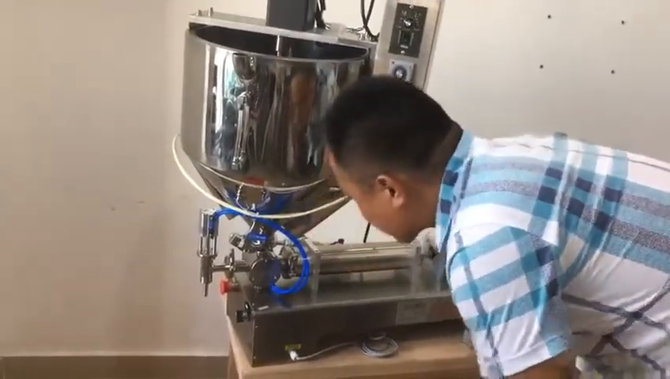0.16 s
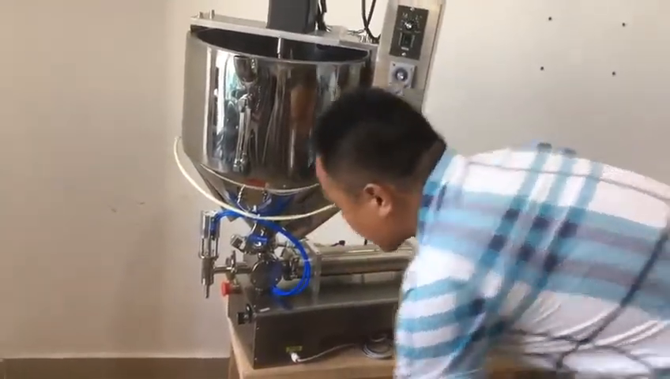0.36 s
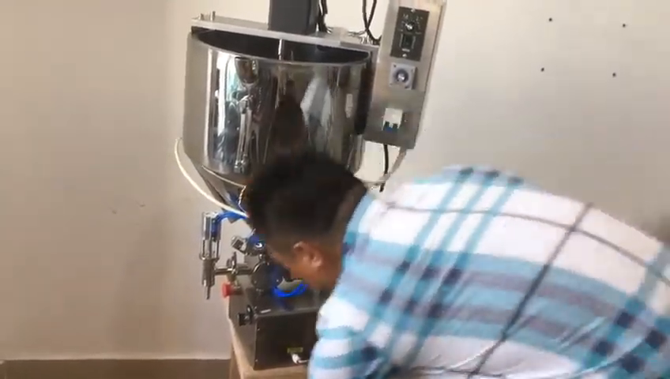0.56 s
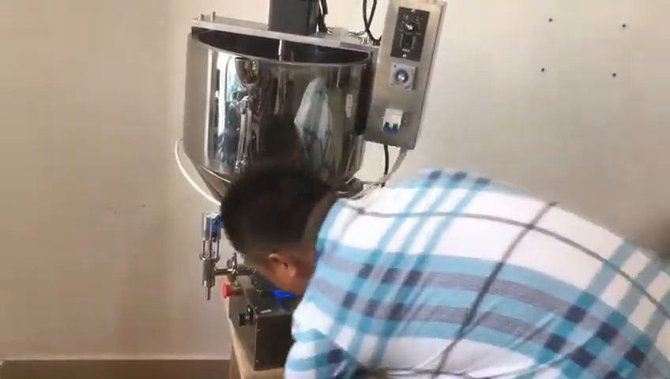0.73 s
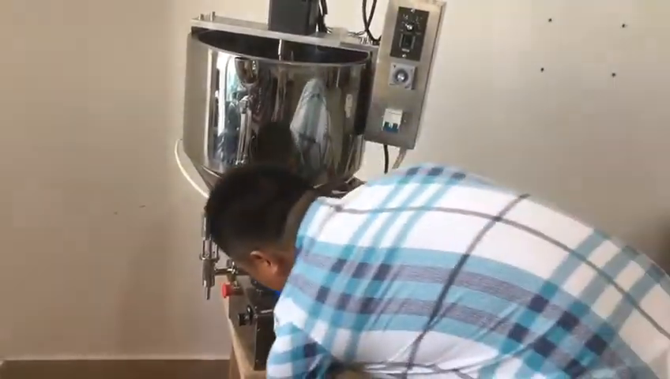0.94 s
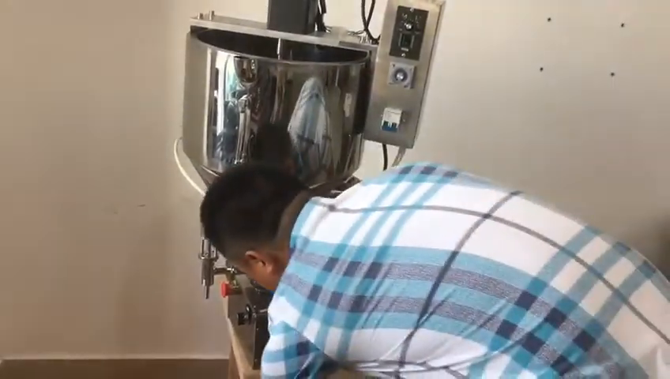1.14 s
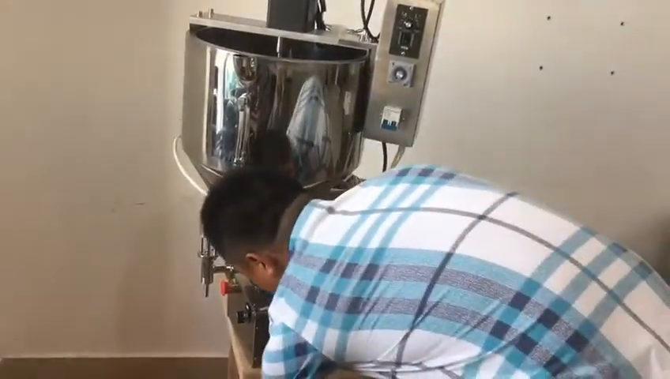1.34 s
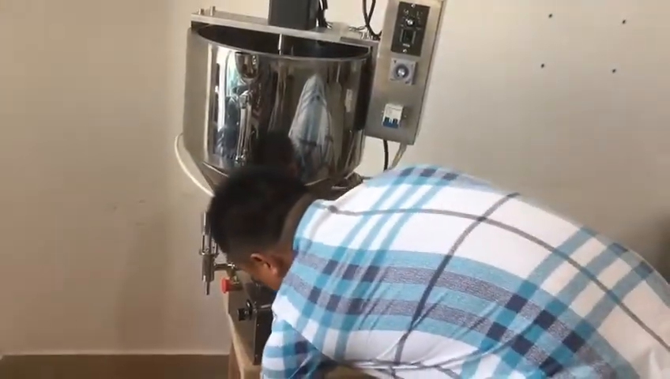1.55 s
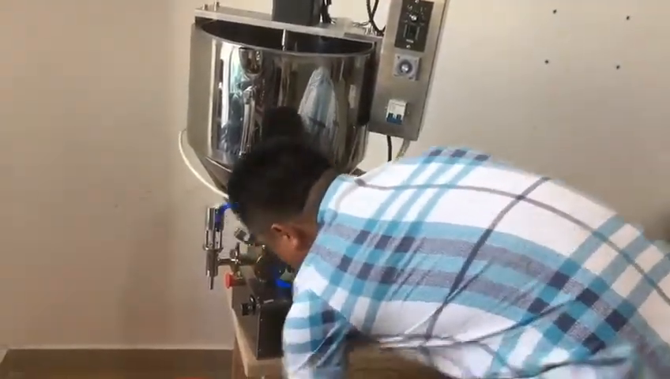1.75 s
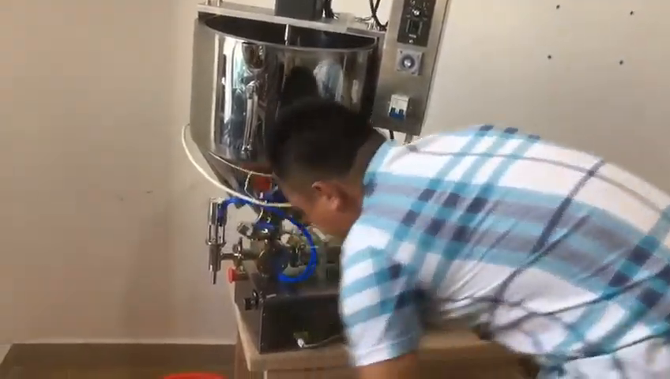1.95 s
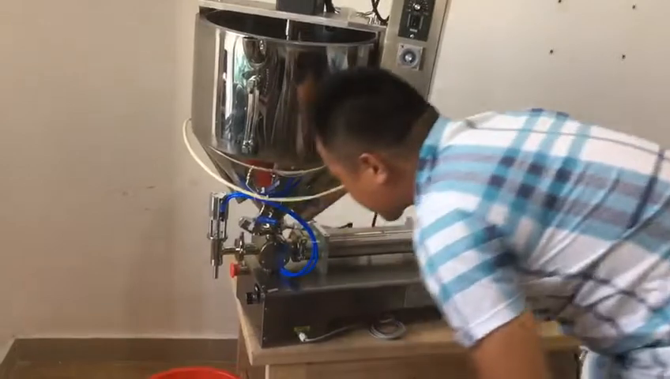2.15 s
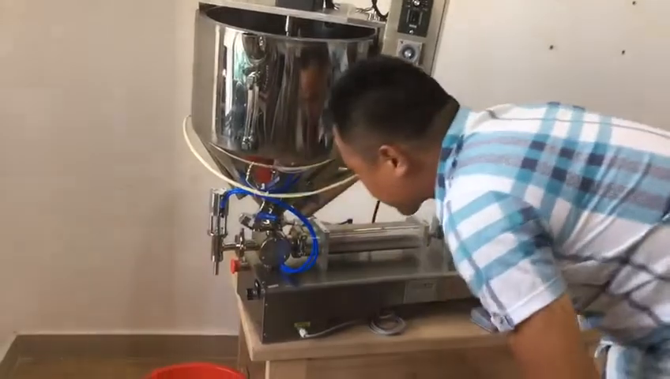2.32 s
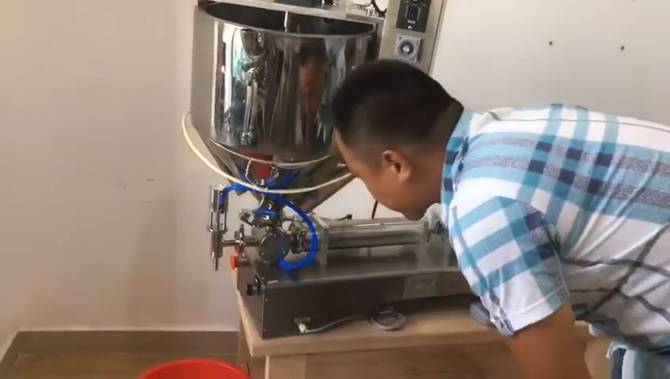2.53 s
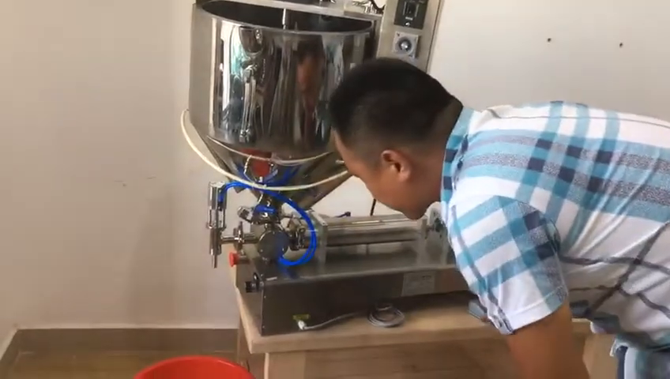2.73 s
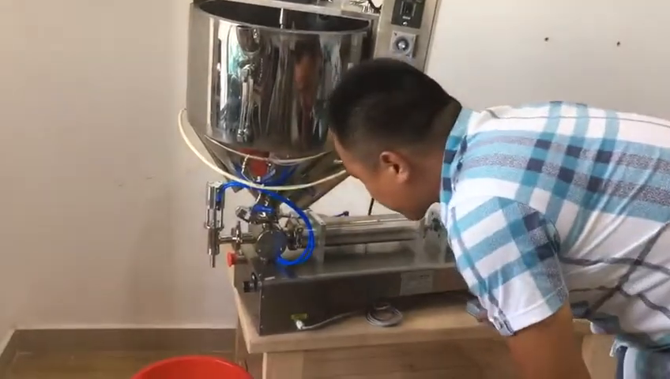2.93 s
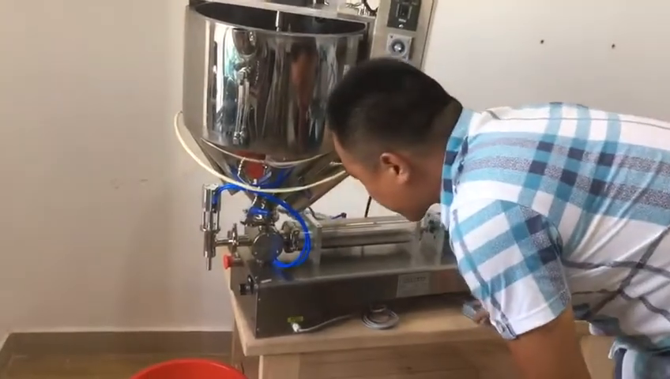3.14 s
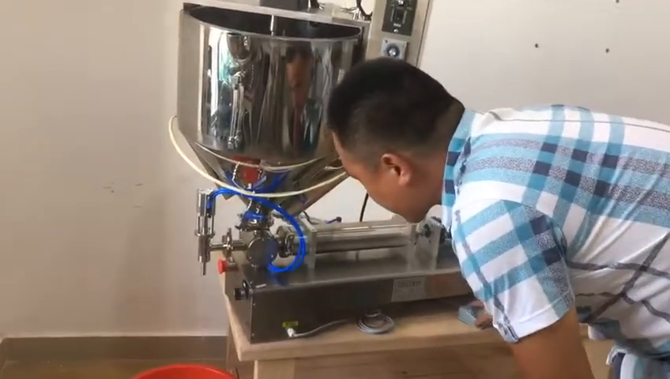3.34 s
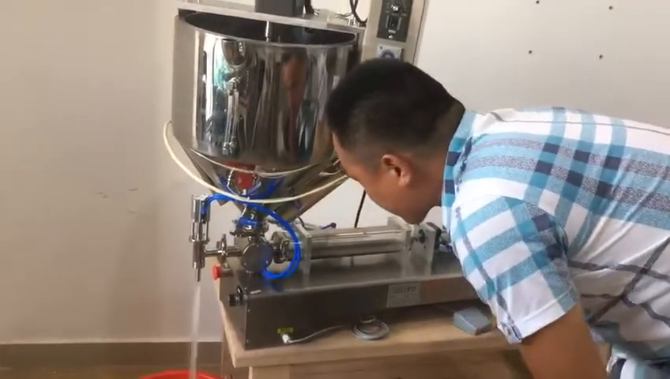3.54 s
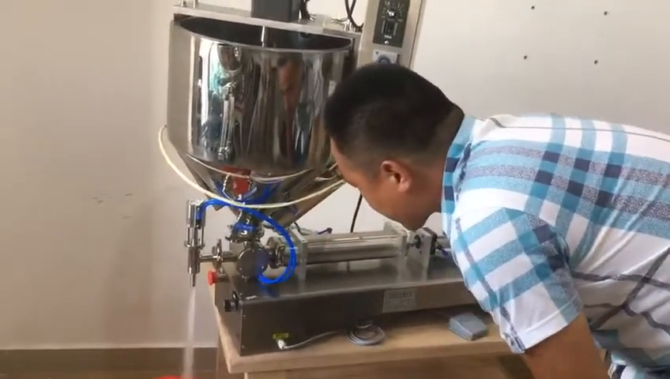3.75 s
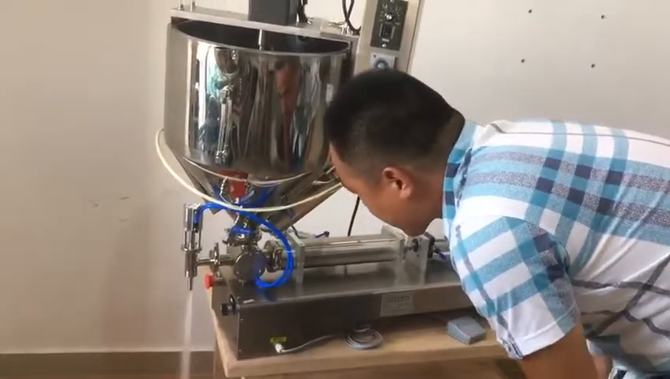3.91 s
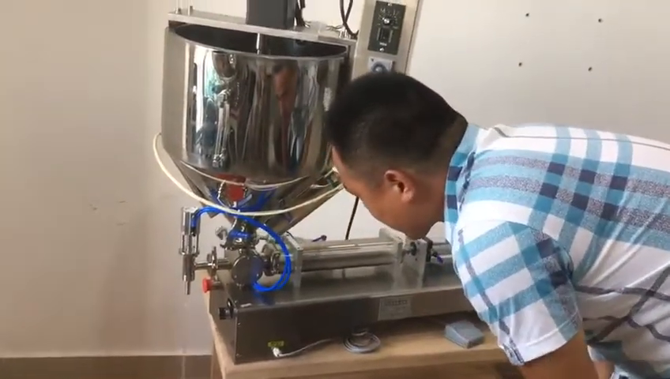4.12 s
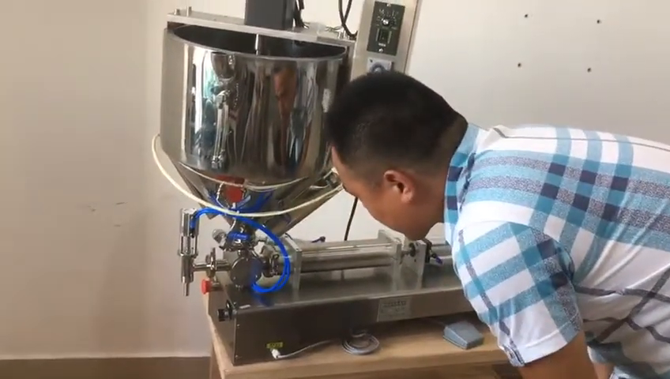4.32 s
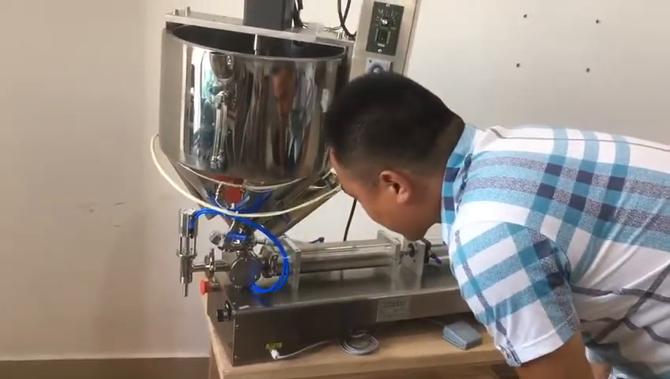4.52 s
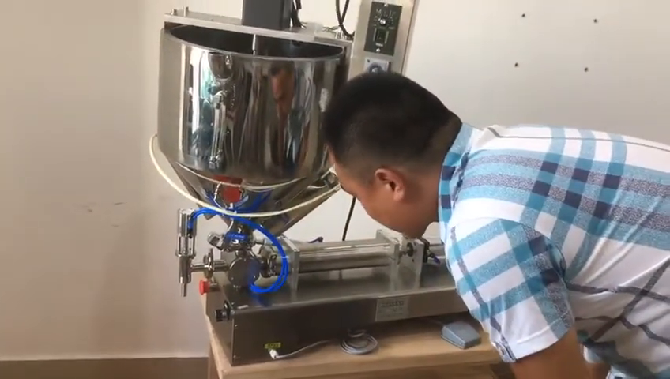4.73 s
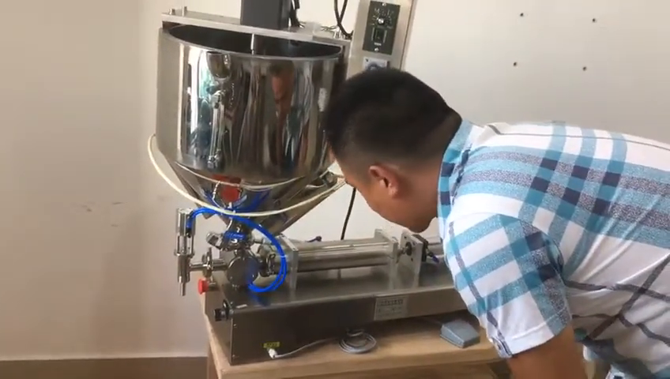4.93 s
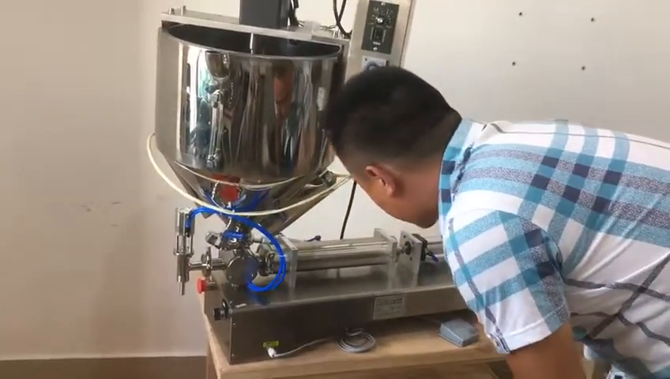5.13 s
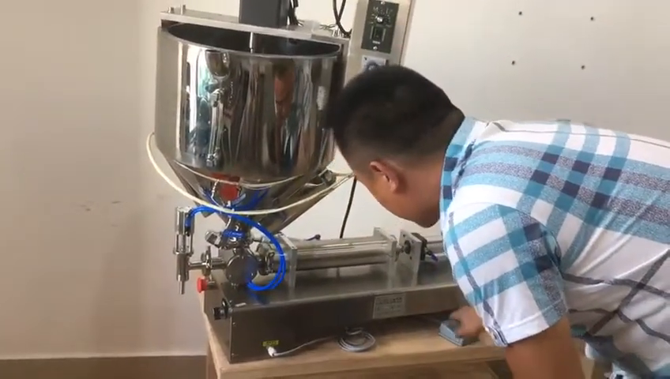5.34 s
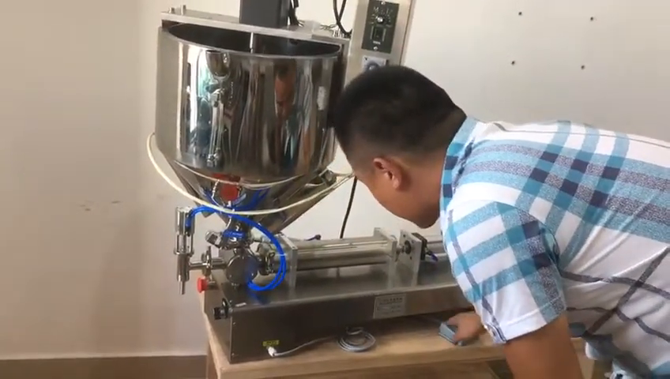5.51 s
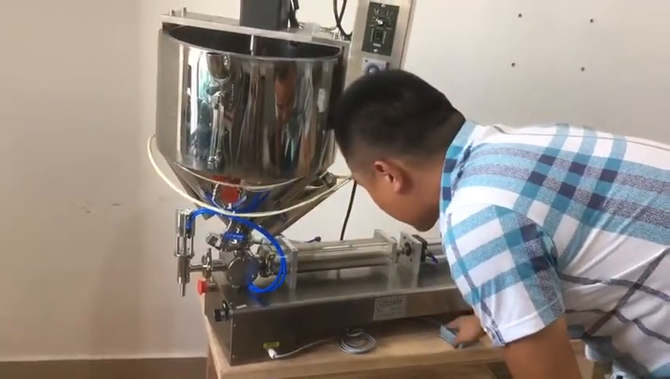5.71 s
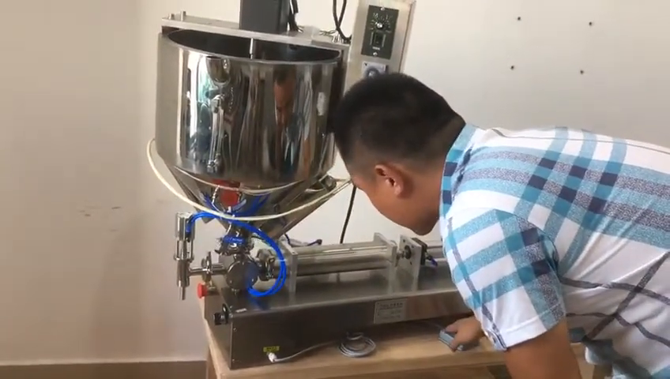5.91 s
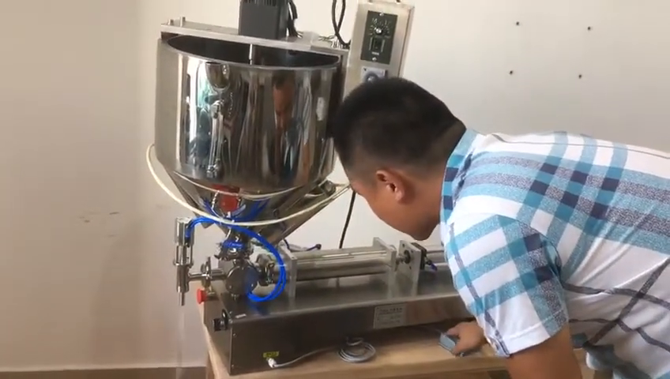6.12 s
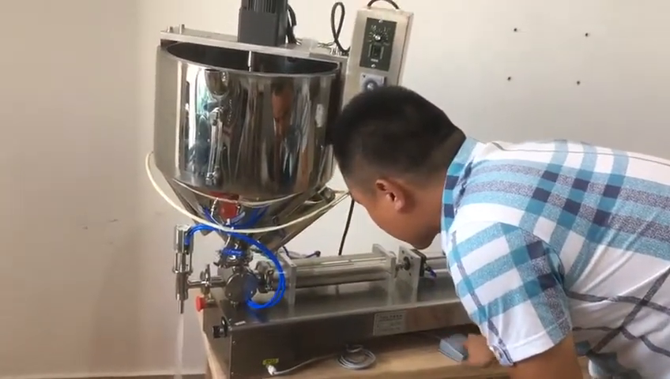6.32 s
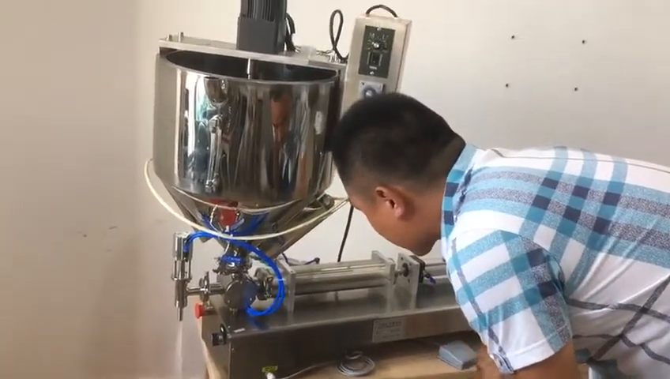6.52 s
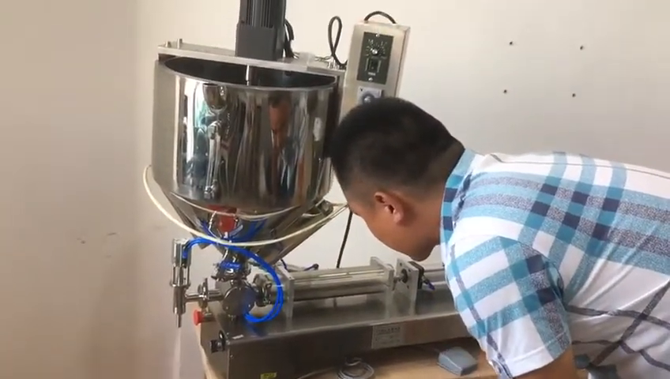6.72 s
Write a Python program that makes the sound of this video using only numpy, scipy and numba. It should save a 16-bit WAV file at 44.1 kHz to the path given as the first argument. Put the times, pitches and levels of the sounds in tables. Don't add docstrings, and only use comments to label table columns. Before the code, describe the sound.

A bare, hard room with a lively short echo and faint distant rumble, heard through a phone. Cloth rustles softly; around 0.8-0.9 s a plastic bucket lands with a quick cluster of hollow knocks. It is nudged near 1.4 and harder at 1.55 s, with small dry ticks after and a short sole squeak at 2.2 s. At 2.97 s a pedal clicks, a valve slams at once, and at 3.15 s a piston hits its stop with a loud double knock and bright burst of hiss. Leaking air whistles; from 3.6 s water drums and gulps in the bucket. A lighter knock and puff at 4.1 s reverse the stroke; spurts thin to a dribble by 5 s. A soft bucket touch at 5.26 s and faint hinge squeak at 5.75 s precede the second click, slam and loud knock at 5.83-6.02 s. Water splatters from 6.3 s to the end.

```python
import sys
import numpy as np
from scipy import signal
from scipy.fft import rfft, irfft, next_fast_len
from scipy.io import wavfile
from scipy.ndimage import uniform_filter1d
from numba import njit

SR = 44100
rng = np.random.default_rng(int(sys.argv[2]) if len(sys.argv) > 2 else 0)


def magnitude_from_level(level_db):
    exponent = np.asarray(level_db, float) / 20
    return 10 ** exponent


def waveform_to_disk(signal):
    frames = np.transpose(np.atleast_2d(signal))
    scaled = np.clip(frames, -1, 1) * 32767
    samples = np.round(scaled).astype(np.int16)
    wavfile.write(sys.argv[1], SR, samples)


N = 298201
T = np.arange(N) / SR

# t/s, crack level/dB, thud level/dB, thud delay/ms
PISTON_BLOWS = [
    (3.154, -4.5, -9.5, 9.45),
    (4.089, -17.5, -23, 1),
    (6.02, -5, -9, 5),
]
# t/s, valve block level/dB, push/ms
VALVE_SLAMS = [
    (3.009, -14.5, 14),
    (5.881, -14.5, 19),
]
# t/s, level/dB, push/ms, f/Hz
PEDAL_CLICKS = [
    (1.41, -30.5, 25, 1020),
    (2.971, -28.5, 8.3, 1080),
    (5.828, -36, 16, 1080),
]
# f/Hz, level/dB, time to fall 60 dB/s
FRAME_MODES = [(708, -2, 0.062), (808, 19.5, 0.15), (910, -4, 0.045), (1230, -4.5, .03), (1433, 2.5, 0.048),
               (1507, -11, 0.12), (2060, -15, 0.0307), (2700, 6.5, 0.035), (3675, -8, 0.0097)]
# f/Hz, level/dB, time to fall 60 dB/s
TABLE_MODES = [(90.6, -15.5, 0.053), (117.7, -7, 0.23), (177.4, -0.5, 0.049), (242, 5, 0.13),
               (296.8, 7, .12), (346.3, 2, 0.11), (401.6, -3.5, 0.28)]
# f/Hz, level/dB, time to fall 60 dB/s
CYLINDER_MODES = [(5100, -17, 0.002), (6750, 8.5, 0.0024), (8200, 6.5, 0.0063), (9170, 5, 0.0052),
                  (10670, -27.5, 0.0032)]
# f/Hz, level/dB, time to fall 60 dB/s
VALVE_MODES = [(670, -8.5, 0.15), (836, 6, 0.077), (906, -10, 0.043), (1354, -7, 0.0084), (2004, -3, .1),
               (4050, -12, 0.043)]
# f/Hz, level/dB, time to fall 60 dB/s
PEDAL_MODES = [(1020, -7.5, 0.0428), (2035, -14, .03), (2625, -8, 0.036)]

# valve opens t/s, its rush level/dB, piston lands t/s, jet arrives t/s, valve reverses t/s
FILL_CYCLES = [
    (3.006, -0.4, 3.157, 3.6, 4.075),
    (5.875, 0.2, 6.022, 6.3, 7.0),
]
# t/s, level/dB
NOZZLE_SPURTS = [
    (3.82, 2.5),
    (3.91, 3),
    (4.33, -1),
    (4.41, -5.5),
    (4.985, -13),
    (6.53, -2),
]
# f/Hz, level/dB per Hz
VENT_SPECTRUM = [(2650, -32), (4500, -18), (5050, -5), (5400, 4.5), (6190, 3), (7150, 3), (7760, -1.5),
                 (9080, 3.5), (9580, -0.5), (11200, 1.5), (12100, -10.5), (15700, -39), (22000, -120)]
# f/Hz, width/Hz, level/dB
SEAL_WHISTLES = [(2900, 2000, 5), (3553, 120, -4), (3850, 50, -8), (3720, 650, -8), (4340, 910, 3.5)]
# f/Hz, width/Hz, level/dB
RETURN_WHISTLES = [(1920, 500, -1.5), (3620, 90, -3), (4480, 56, 0), (5240, 120, 1), (5740, 37, -0.5),
                   (6910, 770, 3)]
# f/Hz, width/Hz, level/dB
ROAR_BANDS = [(1050, 240, -4.5), (1642, 165, -1), (2090, 130, -4.5), (2010, 950, -1)]

# centre t/s, peak level/dB, length/s
WATER_SLUGS = [(3.633, -20.5, .06), (3.67, -24.5, .074), (3.806, -5, .057), (3.879, -13, .035),
               (3.902, -19, 0.019), (3.955, -10, 0.0259), (4.054, -9, 0.01955), (4.121, -11.5, 0.056),
               (4.148, -12, 0.0211), (4.204, -11.5, .025), (4.24, -10, .06), (4.3, -11, 0.0199),
               (4.387, -14.5, .064), (6.329, -20, .035), (6.359, -11.5, 0.0237), (6.382, -7, 0.0356),
               (6.433, -17, 0.0185), (6.447, -10.5, 0.0199), (6.467, -7, .028), (6.492, -3.5, 0.0196),
               (6.525, -4.5, 0.0322), (6.545, -10.5, 0.02403), (6.602, -15, 0.0288), (6.637, -13, 0.0303),
               (6.686, -10.5, .019), (6.712, -3, 0.0308), (6.731, -7.5, 0.0197)]
# t/s, level/dB
JET_FLOW = [
    [(3.58, -36), (3.65, -23.5), (3.8, -20.5), (3.87, -25), (4.1, -21.5), (4.2, -24), (4.28, -29.5),
     (4.57, -43), (4.9, -70)],
    [(6.3, -36.5), (6.36, -30), (6.5, -23.5), (6.55, -24), (6.62, -28.5), (6.76, -24)],
]
# f/Hz, level/dB, time to fall 60 dB/s
WET_BUCKET_MODES = [(168, -21.5, 0.7), (207.4, -10.5, 0.4), (248, -3.5, 0.063), (276, 5.5, 0.076),
                    (326, 3.5, 0.035), (369, -3, 0.15), (427, -7.5, 0.13)]
# f/Hz, level/dB, time to fall 60 dB/s
RIM_MODES = [(645.5, 0, 0.075), (712, 1.5, 0.032), (848, 5, 0.031), (985, 2, 0.042), (1080, 3.5, 0.027),
             (1290, 10, 0.0095), (1446, -1, 0.014), (1777, 5, 0.0063), (2340, -3, 0.0066)]
# f/Hz, level/dB, time to fall 60 dB/s
EMPTY_BUCKET_MODES = [(145.3, -5, 0.1), (202.4, -7, 0.31), (245, -7.5, 0.26), (287.6, 3, 0.13),
                      (337, -16.5, 0.21), (450, -16, 0.051)]
# t/s, level/dB, scratch against the rim level/dB, push/ms, struck part f/Hz
BUCKET_BUMPS = [
    (0.814, -40, -10, 14, 848),
    (0.837, -25, -34, 17, 1110),
    (0.871, -15.5, -38, 8.8, 910),
    (0.893, -30.5, -6.5, 4.8, 670),
    (1.256, -36.5, -33, 9, 806),
    (1.408, -25, -46, 9.4, 1086),
    (1.546, -13, -21.5, 10, 990),
    (1.564, -14, -45, 9.2, 1080),
    (5.258, -39.5, -22, 23, 636),
]
# t/s, rim level/dB, boom level/dB, push/ms, f/Hz
SHOE_SCUFF = [
    (5.262, -36.5, -52, 40, 695),
]

# multiple of its pitch, level/dB
SOLE_HARMONICS = [(1, -11), (2, -3.5), (3, -12), (5, -27)]
# multiple of its pitch, level/dB
HINGE_HARMONICS = [(4, -22), (5, -3), (6, -10), (7, -23)]
# t/s, peak level/dB, f/Hz
SMALL_TICKS = [(0.33, -51, 2410), (1.183, -44.5, 2894), (1.4984, -41.5, 2980), (1.7449, -38, 2200),
               (1.8156, -39, 2184), (1.915, -39, 2120), (2.401, -53, 2460), (4.9907, -37, 4560),
               (5.661, -49, 2740)]
# t/s, level/dB, attack/s, hold/s
CLOTH_MOVES = [(0.02, -60, 0.069, 0.1), (0.188, -56, 0.091, .03), (0.435, -66.5, .02, 0.35),
               (0.76, -57.5, 0.05, .02), (1.602, -52, 0.022, .03), (1.804, -59, 0.007, .01),
               (1.908, -63, .006, 0.027), (2.097, -58.5, 0.042, 0.016), (2.196, -55, 0.0032, .01),
               (2.381, -56.5, 0.035, 0.018)]
# f/Hz, level/dB per Hz
HALL_SPECTRUM = [(15, -36), (25, -12.5), (54, -3.5), (101, -5.5), (121, -12.5), (157, -5), (277, -12.5),
                 (602, -19), (667, -18.5), (910, -15), (1980, -25), (2430, -30.5), (2700, -34.5),
                 (10100, -45.5), (12100, -49), (15700, -87), (22000, -120)]
# f/Hz, time to fall 60 dB/s
ROOM_DECAY = [(60, 0.34), (300, 0.72), (1000, 0.71), (3000, 0.6), (10000, 0.32)]
# f/Hz, level/dB
MIC_RESPONSE = [(25, -10), (60, 0), (400, 0), (490, -4), (600, 0), (12000, 0)]
# f/Hz, level/dB
BAND_DROPS = [(2200, -9), (4600, -1), (4950, 2), (5300, -.5), (7900, 1), (9000, .5), (10200, 3.5),
              (11000, 1.5)]

# frame level/dB, table level/dB, cylinder level/dB, push/ms, f/Hz
CRACK = (-10, -32, -0.5, 8.5, 1501)
THUD = (1.5, 0.5, -14.5, 5.5, 1508.5)
SLAM_TABLE_DB, SLAM_CRACK_DB, SLAM_HZ = -22, -23.5, 1960

# vent level/dB, seal level/dB, roar level/dB, attack/s, fall/dB per s
OPENING = (-29.5, -28.5, -35, -0.08, 400)
LANDING = (-19.5, -19, -12, -0.14, 278.5)
PUSHING = (-44.5, -34, -44.5, 0.06, 67)
SPRAYING = (-34, -47, -40.5, 0.5, 74)
REVERSING = (-30.5, -34.5, -31.5, .015, 198.5)
RETURNING = (-50.5, -42, -46.5, 0.03, 73)
SPITTING = (-32.5, -33, -31, 0, 89)
DRIBBLING = (-36, -42, -44, .015, 160)
PUFF_S, SPRAY_ON_S, RETURN_S = 0.08, 0.13, 0.78
SHUDDER_DB, SHUDDER_RISE_S, SHUDDER_FALL_DB_S = -36, 0.05, 72

DRUM_DB, SPLASH_DB = -1, -0.5
TRICKLE_DB, SPLASH_FADE = -30.5, 1.6
EMPTY_HZ, FULL_HZ, FILL_S = 256.8, 303.3, 0.69
SLUG_SCATTER = 0.027
FIRST_SAG, FIRST_S = 0.32, .03
BOOM_DB = -1.5
RUSTLE_FALL_DB_S = 86
HALL_DB = -48.5
DROP_DB, BUSY_DB, CALM_DB = -3.5, -86, -62


def machine():
    def blow(s, db, kind):
        *body_dbs, push_ms, hz = kind
        return (s, *(db + body_db for body_db in body_dbs), push_ms, hz)

    blows = []
    for s, crack_db, thud_db, late_ms in PISTON_BLOWS:
        blows.append(blow(s, crack_db, CRACK))
        blows.append(blow(s + late_ms / 1000, thud_db, THUD))
    slams = [(s, db, SLAM_TABLE_DB, SLAM_CRACK_DB, push_ms, SLAM_HZ) for s, db, push_ms in VALVE_SLAMS]
    knocks = strike(blows, FRAME_MODES, TABLE_MODES, CYLINDER_MODES)
    knocks = knocks + strike(slams, VALVE_MODES, TABLE_MODES, CYLINDER_MODES)
    return radiate(knocks + strike(PEDAL_CLICKS, PEDAL_MODES), low_hz=80)


def air():
    power, shake, back = 0, 0, 0
    for opens, rush_db, lands, jet, turns in FILL_CYCLES:
        power = power + (magnitude_from_level(rush_db) * stage(OPENING, opens, lands)) ** 2
        stages = [(LANDING, lands, lands), (PUSHING, lands, turns), (SPRAYING, jet, turns + SPRAY_ON_S),
                  (REVERSING, turns, turns + PUFF_S), (RETURNING, turns, turns + RETURN_S),
                  (SPITTING, jet + .01, jet + 0.027)]
        power = power + sum(stage(*row) ** 2 for row in stages)
        shake = shake + magnitude_from_level(SHUDDER_DB) * envelope(opens, SHUDDER_RISE_S, lands, SHUDDER_FALL_DB_S)
        back = back + magnitude_from_level(1.7) * np.clip((T - turns - .21) / 0.26, 0, 1) * (T < turns + 1.3)
    power = power + sum((magnitude_from_level(db) * stage(DRIBBLING, s - .02, s)) ** 2 for s, db in NOZZLE_SPURTS)
    vent, seal, roar = np.sqrt(power)
    hiss = level(colour(rng.standard_normal(N), VENT_SPECTRUM)) * magnitude_from_level(1.6 * walk(30))
    whistle = bands(SEAL_WHISTLES) + back * bands(RETURN_WHISTLES)
    trembling = ring(rng.standard_normal(N), TABLE_MODES[3:])
    shudder = shake * level(radiate(trembling, low_hz=180))
    return vent * hiss + seal * whistle + roar * bands(ROAR_BANDS) + shudder


def stage(kind, s, until_s):
    *dbs, attack_s, fall_db_s = kind
    return np.array([magnitude_from_level(db) for db in dbs])[:, None] * envelope(s, attack_s, until_s, fall_db_s)


def water():
    flow_db = np.max([np.interp(T, *np.transpose(rows), left=-200, right=-200) for rows in JET_FLOW], axis=0)
    drum = magnitude_from_level(flow_db + DRUM_DB)
    splash = magnitude_from_level(flow_db + SPLASH_DB + SPLASH_FADE * np.minimum(flow_db - TRICKLE_DB, 0))
    sizes = magnitude_from_level(np.minimum(2.5 * rng.exponential(size=(2, N)), 8))
    landed = rng.random((2, N)) < 2500 / SR
    drops = rng.standard_normal((2, N)) * sizes * landed
    floor = level(ring(drops[0], WET_BUCKET_MODES))
    wall = level(ring(drops[1] * magnitude_from_level(1.5 * walk(20)), RIM_MODES))
    return radiate(drum * floor + splash * wall + slugs(), low_hz=155)


def slugs():
    out = np.zeros(N + SR)
    for (s, db, length), chance in zip(WATER_SLUGS, rng.standard_normal(len(WATER_SLUGS))):
        empty = np.exp(-(s - JET_FLOW[0][0][0]) / FILL_S)
        hz = (FULL_HZ - (FULL_HZ - EMPTY_HZ) * empty) * (1 + SLUG_SCATTER * chance)
        since_jet = min(abs(s - rows[0][0]) for rows in JET_FLOW)
        hz *= 1 - FIRST_SAG * np.exp(-since_jet / FIRST_S)
        t = T[:int(max(1.3 * length, .01) * SR)]
        swell = np.abs(np.sin(np.pi * t / t[-1])) ** 3.4
        out[int(s * SR) - len(t) // 2:][:len(t)] += magnitude_from_level(db) * swell * np.sin(2 * np.pi * hz * t)
    return out[:N]


def bucket():
    scratch = [(2700, 19, 0.005), (4300, -29, 0.0022), (7040, -21, .001)]  # f/Hz, level/dB, 60 dB fall/s
    rows = [(s, db, db + BOOM_DB, db + scratch_db, push_ms, hz)
            for s, db, scratch_db, push_ms, hz in BUCKET_BUMPS]
    bumps = strike(rows, RIM_MODES, EMPTY_BUCKET_MODES, scratch)
    return radiate(bumps + strike(SHOE_SCUFF, RIM_MODES, EMPTY_BUCKET_MODES), low_hz=115)


def squeak(orders, start_s, length_s, db, hz, fall, waver):
    t = np.clip((T - start_s) / length_s, 0, 1)
    phase = 2 * np.pi * np.cumsum(hz * (1 - fall * t + waver * walk(300))) / SR
    shape = np.abs(np.sin(np.pi * t ** .6)) ** .5 * (t < 1) * magnitude_from_level(db + 3 * walk(120))
    return shape * sum(magnitude_from_level(order_db) * np.sin(k * phase) for k, order_db in orders)


def ticks():
    out, t = np.zeros(N), T[:SR // 20]
    for s, db, hz in SMALL_TICKS:
        burst = rng.standard_normal(len(t)) * np.exp(-t / 0.0037)
        click = ring(burst, [(hz, 0, .004), (1.9 * hz, -4, .002)])
        out[int(s * SR):][:len(t)] += click * magnitude_from_level(db) / np.abs(click).max()
    return out


def clothes():
    grains = rng.standard_normal(N) * magnitude_from_level(1.94 * walk(60.13))
    cloth = level(colour(grains, [(1000, -1.5), (2500, 0), (6000, -10.5), (11500, -18.5), (13000, -57)]))
    return cloth * sum(magnitude_from_level(db) * envelope(s, attack_s, s + attack_s + hold_s, RUSTLE_FALL_DB_S)
                       for s, db, attack_s, hold_s in CLOTH_MOVES)


def workshop():
    noise = 0
    for hz in 30 * 2 ** np.arange(0, 9, .5):
        edges = [(hz / 1.42, -40), (hz / 1.19, -3), (hz * 1.19, -3), (hz * 1.42, -40)]
        noise = noise + colour(rng.standard_normal(N), edges) * magnitude_from_level(1.57 * walk(4.6))
    return level(colour(noise, HALL_SPECTRUM), HALL_DB)


def room(x):
    t, tail = T[:SR], 0
    decay_hz, decay_s = np.transpose(ROOM_DECAY)
    for hz in 60 * 2 ** np.arange(8):
        edges = [(hz / 2, -40), (hz / 1.4, -3), (hz, 0), (hz * 1.4, -3), (hz * 2, -40)]
        t60 = np.interp(np.log(hz), np.log(decay_hz), decay_s)
        tail = tail + colour(rng.standard_normal(SR), edges) * magnitude_from_level(-60 * t / t60)
    modes = rfft(tail)
    size = np.abs(modes)
    limit = np.minimum(1, 1.1 * uniform_filter1d(size, size=120) / size)
    tail = irfft(modes * limit, SR) * (t < .9)
    tail = tail * (1 - np.exp(-(t / 0.007) ** 2))
    return signal.fftconvolve(x, tail / np.sqrt(np.sum(tail ** 2) * 2))[:N]


def strike(rows, *bodies):
    out, t = np.zeros(N + SR), T[:SR // 2]
    for s, *dbs, push_ms, spot_hz in rows:
        rattle = rng.standard_normal(len(t)) * np.exp(-t / (max(push_ms, .5) / 1000))
        shove = t * np.exp(-t / .0006)
        near = [(hz, db - 11.0 * np.log2(hz / spot_hz) ** 2, min(t60, .025)) for hz, db, t60 in bodies[0]]
        for db, modes, drive in zip(dbs, (near, *bodies[1:]), (rattle, shove, rattle)):
            sound = ring(drive, modes)
            if drive is shove:
                sound = sound * (1 - np.exp(-t / 0.0088))
            out[int(s * SR):][:len(t)] += sound * magnitude_from_level(db) / np.abs(sound).max()
    return out[:N]


@njit
def resonate(x, pole):
    y, z = np.empty(len(x)), 0j
    for i in range(len(x)):
        z = z * pole + x[i]
        y[i] = z.imag
    return y


def ring(x, modes):
    out = 0
    for hz, db, t60 in modes:
        pole = np.exp((2j * np.pi * hz - np.log(1000) / t60) / SR)
        out = out + magnitude_from_level(db) * resonate(x, pole)
    return out


def bands(peaks):
    out = 0
    for hz, width_hz, db in peaks:
        flicker = magnitude_from_level(db + 1.3 * walk(25))
        t60 = np.log(1000) / (np.pi * width_hz)
        out = out + flicker * level(ring(rng.standard_normal(N), [(hz, 0, t60)]))
    return level(out)


def radiate(x, low_hz):
    return signal.sosfilt(signal.butter(4, low_hz, "high", fs=SR, output="sos"), x)


def envelope(s, attack_s, until_s, fall_db_s):
    rise = np.clip((T - s) / max(attack_s, .001), 0, 1)
    return rise * magnitude_from_level(-abs(fall_db_s) * np.maximum(T - until_s, 0))


def walk(rate):
    k = int(SR / rate)
    steps = np.repeat(rng.standard_normal(N // k + 1), k)
    return 1.4 * uniform_filter1d(uniform_filter1d(steps, k), k)[:N]


def level(x, db=0):
    return x * magnitude_from_level(db) / np.sqrt(np.mean(x ** 2))


def colour(x, points):
    size = next_fast_len(len(x))
    hz, db = np.transpose(points)
    gain = magnitude_from_level(np.interp(np.log(np.fft.rfftfreq(size, 1 / SR) + 1), np.log(hz), db))
    return irfft(rfft(x, size) * gain, size)[:len(x)]


def scene():
    hits = machine() + bucket() + ticks()
    sole = squeak(SOLE_HARMONICS, start_s=2.198, length_s=.036, db=-33.5, hz=1215, fall=-.01, waver=.022)
    hinge = squeak(HINGE_HARMONICS, start_s=5.74, length_s=.1, db=-54, hz=465, fall=0, waver=.004)
    puffs, jet = air(), water()
    wet = magnitude_from_level(-2) * hits + magnitude_from_level(-6.5) * (sole + hinge) + magnitude_from_level(-8.5) * puffs + magnitude_from_level(-8.0) * jet
    return (hits + sole + hinge + puffs + jet + room(wet) + workshop() + clothes())[None]


def starve(x):
    hz, _, z = signal.stft(x, SR, "hann", 2048, 1024)
    power = np.abs(z[:-1]) ** 2 + 1e-20
    narrow = 10 * np.log10(uniform_filter1d(power.reshape(128, 8, -1).mean(1), size=2))
    wide = uniform_filter1d(narrow, size=11, axis=0)
    chance = 2.9 * uniform_filter1d(rng.standard_normal(narrow.shape), size=3)
    ready = np.interp(hz[4::8], *np.transpose(BAND_DROPS), left=-40, right=0)[:, None]
    ready = ready + np.clip((CALM_DB - wide) / 6, -1.5, 1.5)
    silent = (narrow - wide < DROP_DB + ready + chance) & (wide > BUSY_DB)
    z[:-1] *= ~np.repeat(silent, 8, axis=0)
    return signal.istft(z, SR, "hann", 2048, 1024)[1][:N]


def top_cut(x):
    return signal.sosfilt(signal.butter(12, 12230, fs=SR, output="sos"), x)


def record(dry):
    heard = np.tanh(1.053 * colour(dry[0], MIC_RESPONSE)) / 1.167
    mix = starve(heard)[None]
    return top_cut(mix)


dry = scene()
out = record(dry)
waveform_to_disk(out)
```